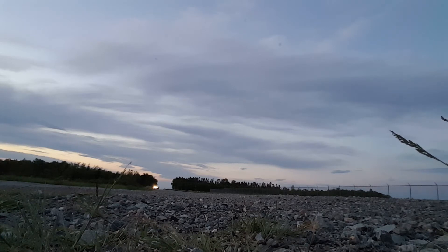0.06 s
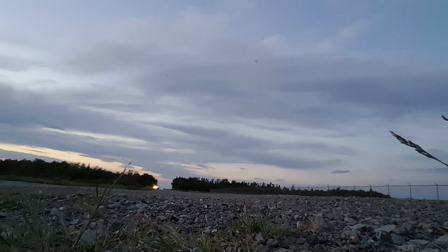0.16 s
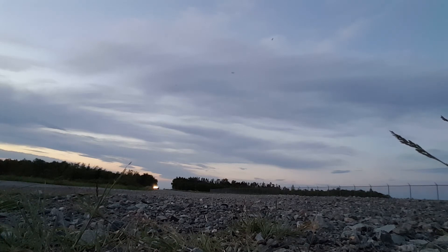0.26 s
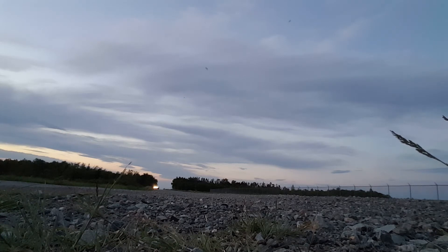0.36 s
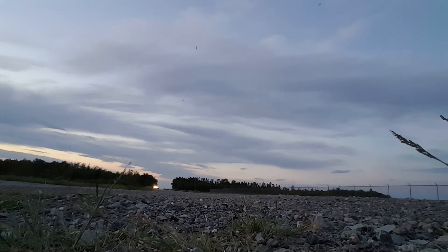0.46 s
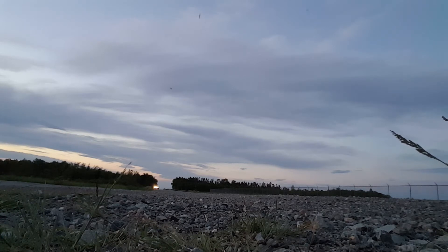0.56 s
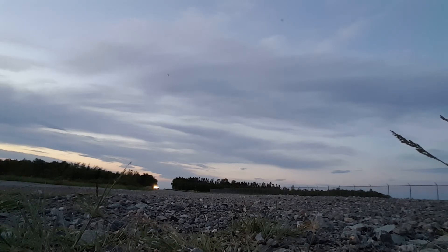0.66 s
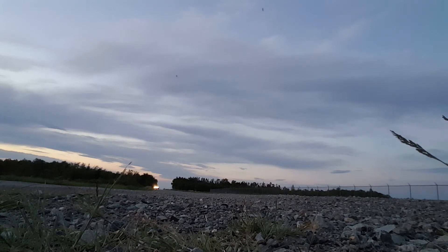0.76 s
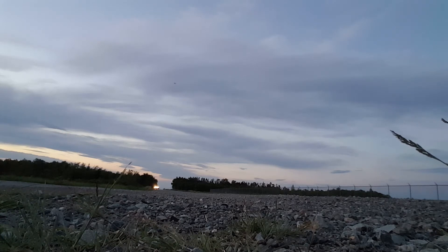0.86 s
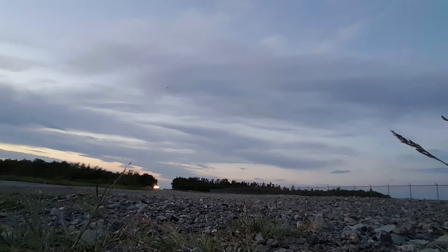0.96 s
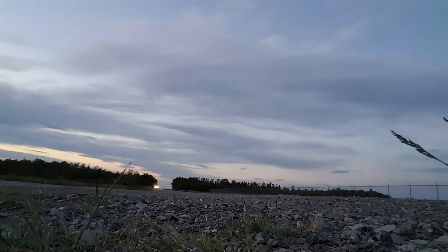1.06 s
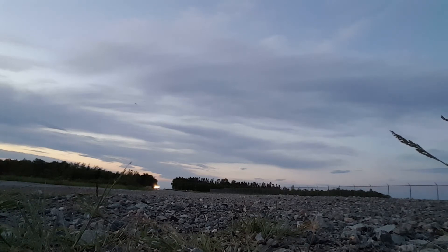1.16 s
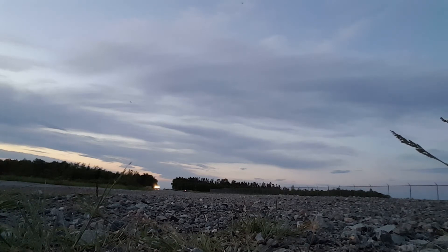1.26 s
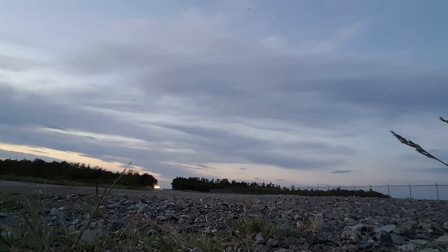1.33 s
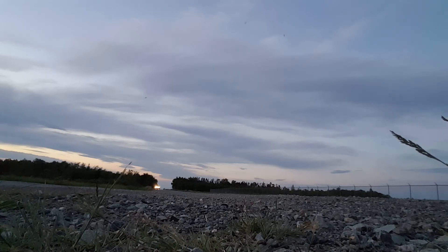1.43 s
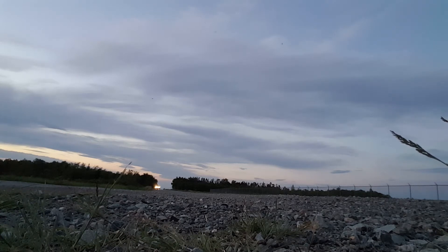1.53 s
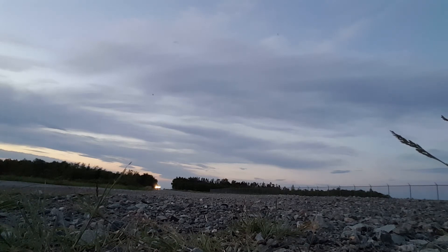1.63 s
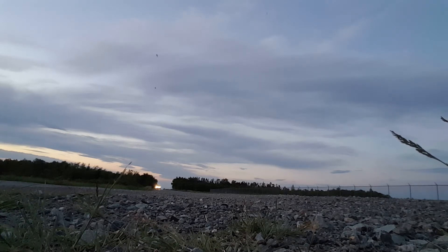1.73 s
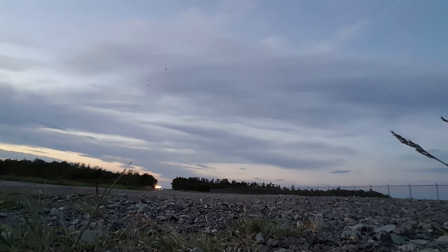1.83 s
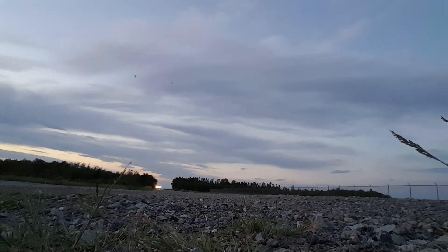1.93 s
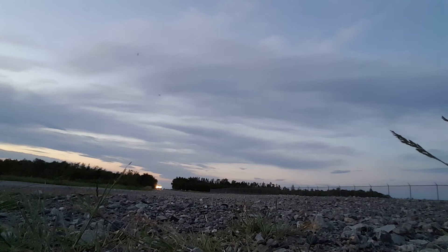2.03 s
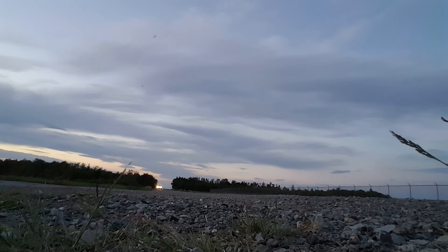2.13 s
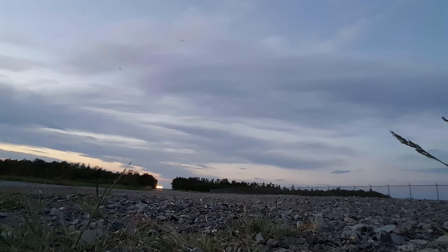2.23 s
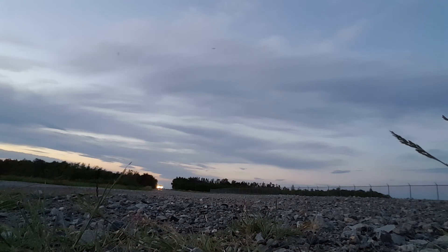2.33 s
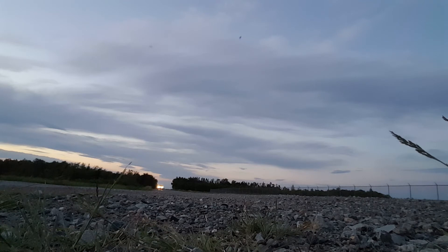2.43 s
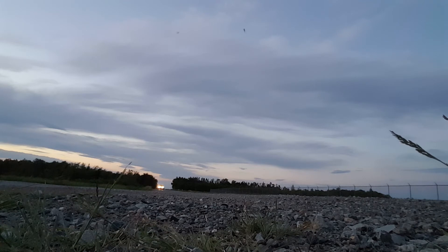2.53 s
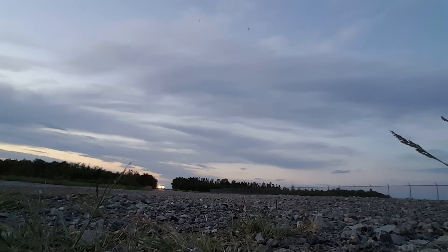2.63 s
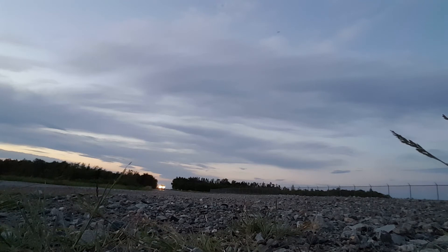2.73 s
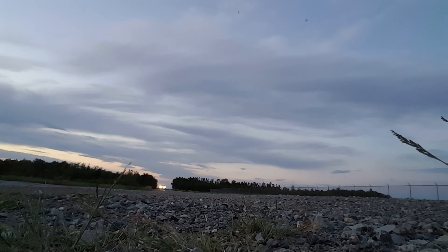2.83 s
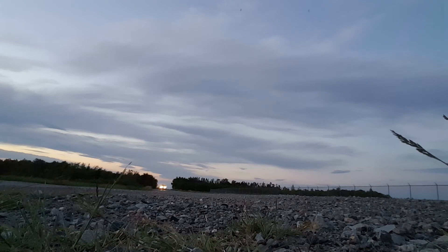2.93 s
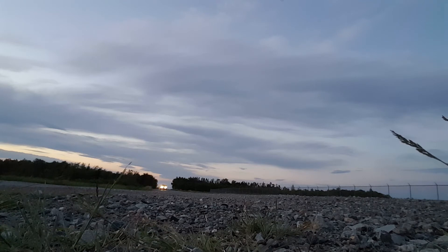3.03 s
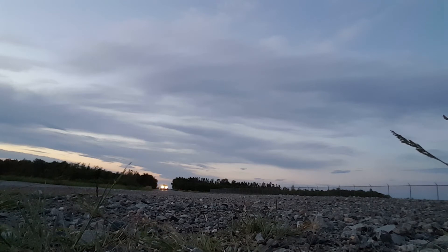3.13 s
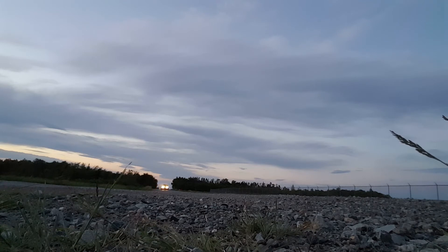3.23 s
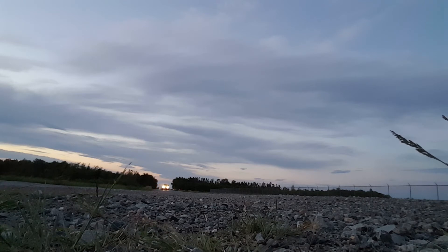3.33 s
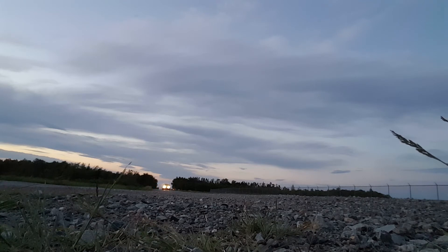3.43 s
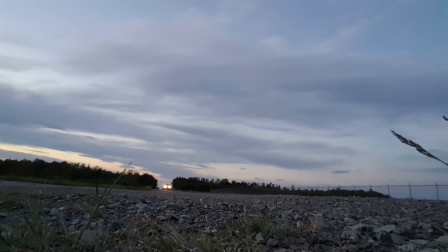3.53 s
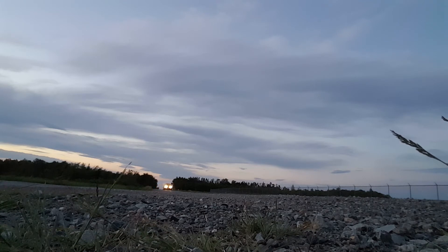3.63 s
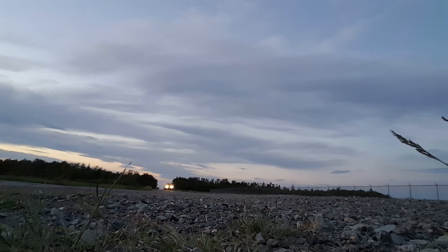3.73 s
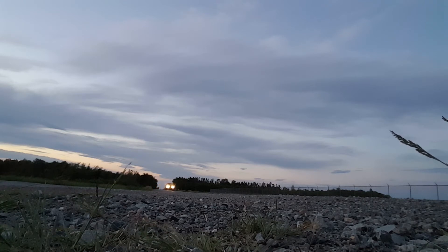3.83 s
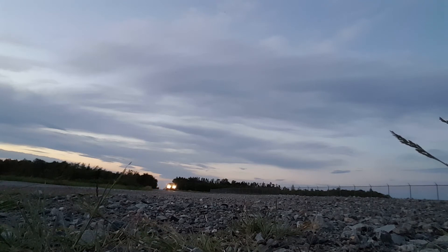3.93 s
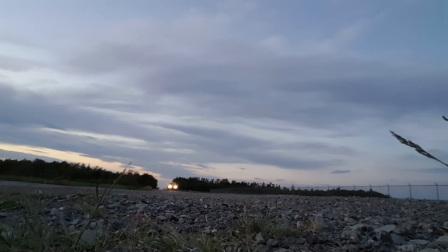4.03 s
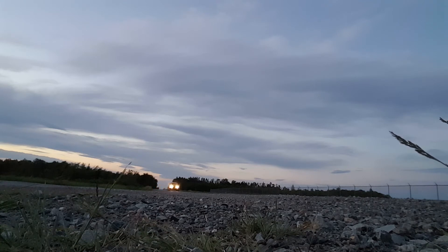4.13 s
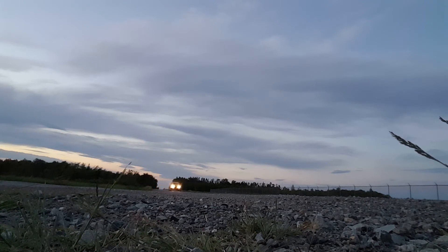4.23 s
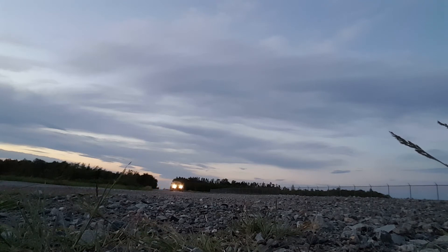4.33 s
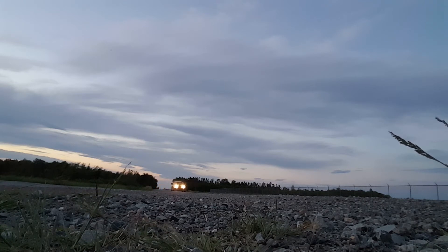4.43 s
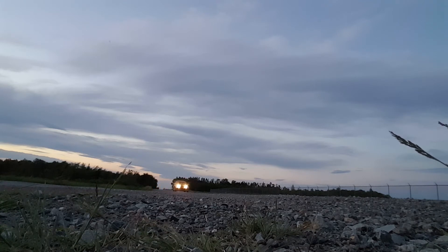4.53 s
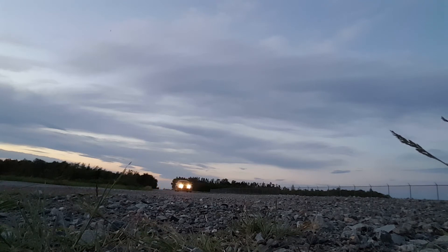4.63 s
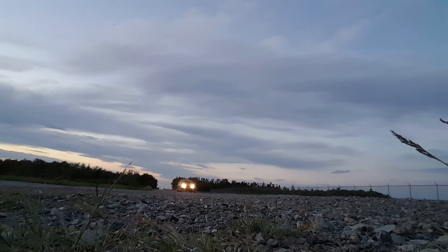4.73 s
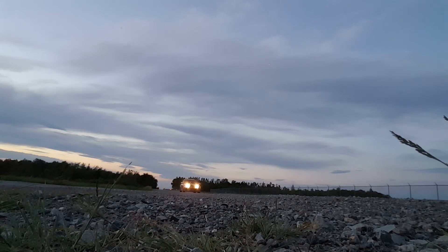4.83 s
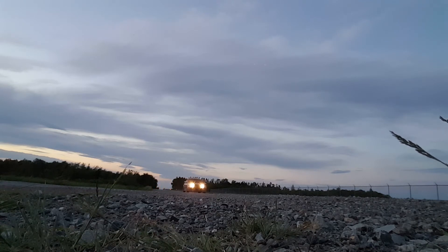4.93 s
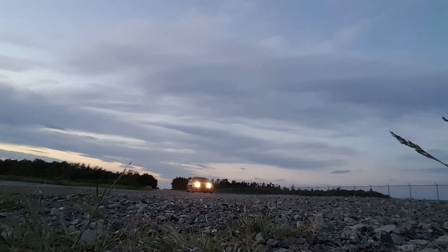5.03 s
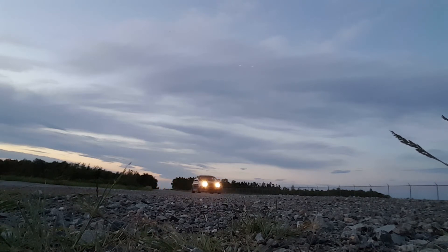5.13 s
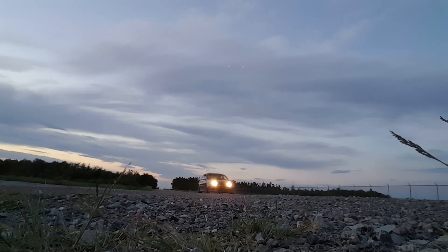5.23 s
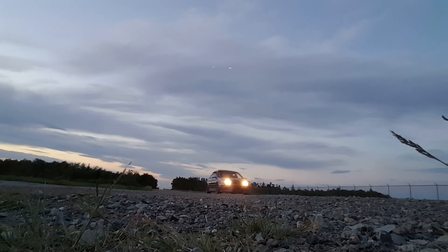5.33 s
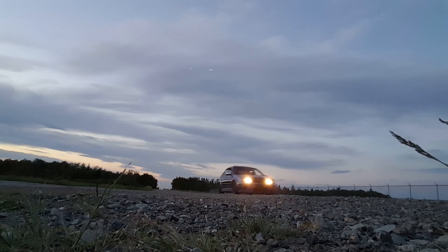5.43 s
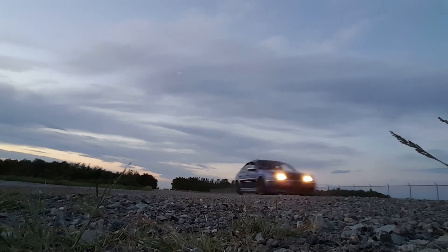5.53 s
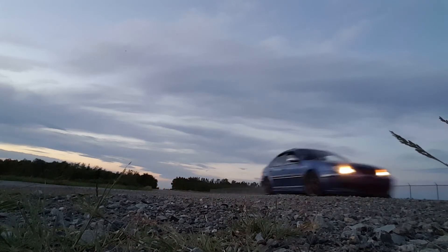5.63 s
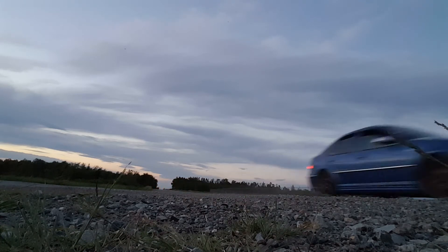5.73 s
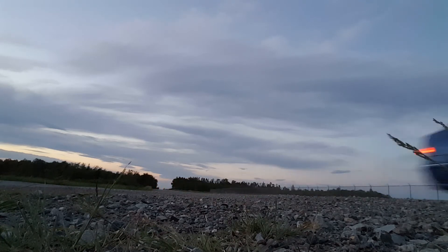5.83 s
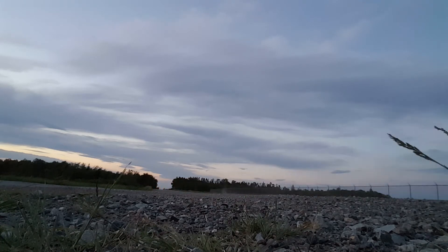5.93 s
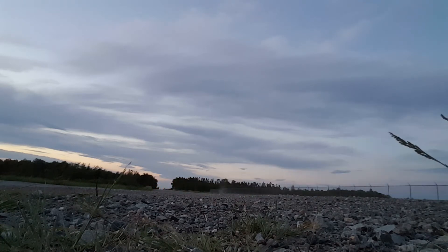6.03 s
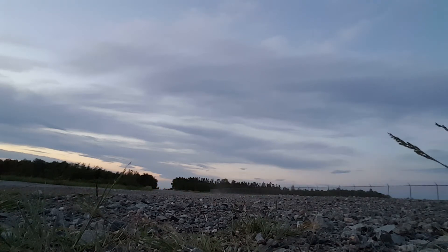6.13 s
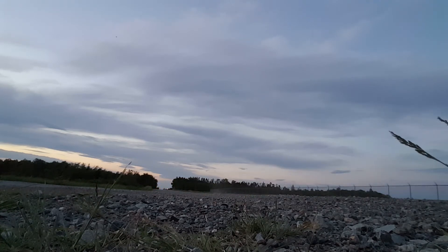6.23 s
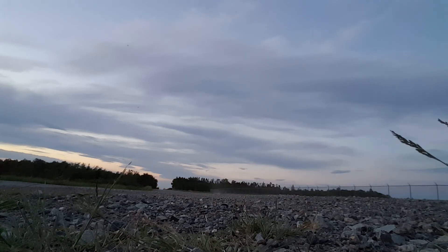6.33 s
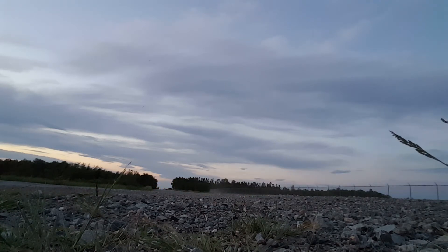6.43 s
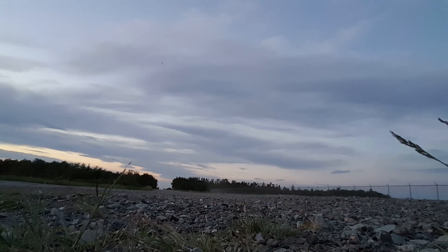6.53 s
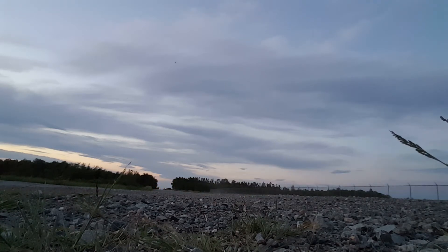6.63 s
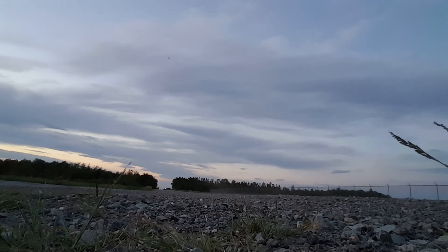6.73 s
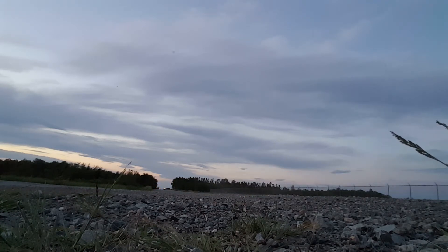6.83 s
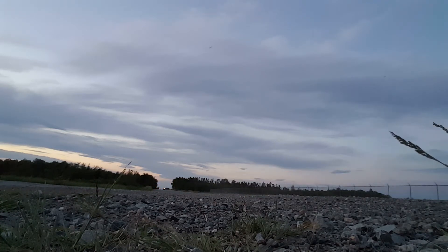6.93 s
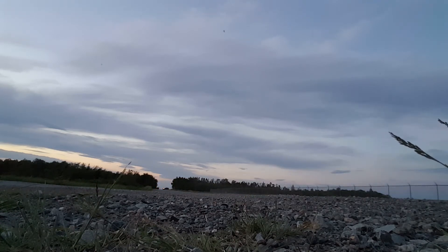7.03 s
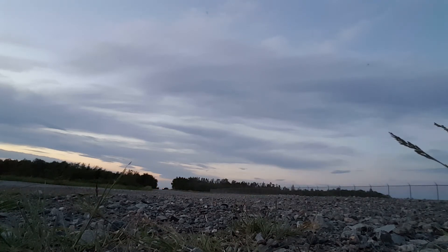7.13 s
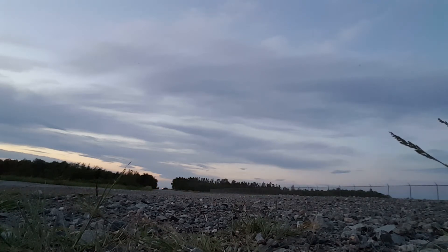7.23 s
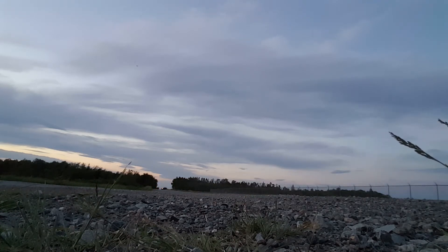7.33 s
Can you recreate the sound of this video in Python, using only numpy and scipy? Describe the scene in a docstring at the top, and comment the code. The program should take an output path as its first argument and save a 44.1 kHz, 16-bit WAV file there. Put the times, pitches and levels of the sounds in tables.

```python
"""Over a faint steady hiss, a turbocharged four-cylinder car accelerates up a country road: firing tones and
their quarter steps are summed sines, tyre and air roar is banded noise. It lifts to shift with a thump and burble;
then a turbo whistle and a fainter whine, both jittered sines, rise. It passes a phone lying at the verge, shows
its tailpipe and lifts again. The phone's two ports hear it with a lag and a shadow that follow its bearing."""
import sys
import numpy as np
from scipy import signal
from scipy.fft import rfft, irfft
from scipy.io import wavfile
from scipy.ndimage import uniform_filter1d, minimum_filter1d, map_coordinates

SR = 44100
rng = np.random.default_rng(int(sys.argv[2]) if len(sys.argv) > 2 else 0)


def store_wav(level_fs):
    """Save 16-bit WAV to argv[1]."""
    pcm = np.round(np.clip(np.atleast_2d(level_fs), -1, 1) * 32767)
    wavfile.write(sys.argv[1], SR, pcm.T.astype(np.int16))


N = 324576

# Exhaust as heard: (time [s], firing rate [Hz], 1st firing tone [dB], 2nd firing tone [dB])
EXHAUST = [(0.05, 136, -56, -65.5), (0.6, 147.6, -43, -56), (1.2, 163.1, -42.5, -51),
           (1.5, 170.6, -52.5, -47), (2.1, 191.7, -44.5, -56), (2.4, 202, -44.5, -71.5),
           (2.85, 216.7, -33.5, -50.5), (3.55, 235.7, -29, -47), (3.69, 222.2, -32, -46),
           (3.86, 217.4, -29.5, -43.5), (3.97, 203.9, -30, -56), (4.09, 167.5, -36.5, -55),
           (4.4, 173.6, -29, -41.5), (5, 185.9, -33, -35.5), (5.55, 194.6, -21, -18.5),
           (5.8, 191.5, -15.5, -22.5), (5.88, 185.5, -7, -37), (5.94, 188, -20, -17.5),
           (5.985, 185.5, -11.5, -20), (6.025, 183.3, -20.5, -18.5), (6.09, 176.7, -15, -18),
           (6.18, 174.4, -21.5, -17), (6.27, 171, -19.5, -18), (6.35, 164, -28, -20),
           (6.43, 168.1, -26, -33.5), (6.85, 156.9, -34, -42.5), (6.92, 155.8, -26, -27),
           (6.98, 149.2, -36.5, -29), (7.1, 132.3, -20, -25.5), (7.25, 134.2, -14.5, -20),
           (7.36, 132.7, -19, -21)]
# Upper exhaust tones: (time [s], 3rd firing tone [dB], cylinder unevenness [dB],
# rasp above the 3rd tone [dB over the unevenness])
UPPER_EXHAUST = [(0.05, -73, -77, 6), (0.6, -58, -59, 4.5), (1.2, -65.5, -62.5, 1), (1.6, -61, -49.5, -7),
                 (2.4, -62, -51.5, -1), (2.95, -55, -48.5, 9), (3.55, -49.5, -43.5, 10.5),
                 (4.09, -54, -48, 5.5), (4.4, -50.5, -39, 3.5), (5, -50, -38.5, 3), (5.7, -29, -26.5, 0),
                 (5.95, -26, -24, 7), (6.29, -25.5, -22.5, 2.5), (6.47, -62, -36, -11),
                 (6.85, -59, -42, -7), (7.1, -26.5, -30, -2.5), (7.25, -20, -33, 0.5)]
# Offsets over the unevenness, by quarter step: (higher firing tones, then a quarter, half, three quarters above [dB])
QUARTER_STEP_DB = [2, -8, -4.5, -2.5]
# Pipe resonances: (centre [Hz], width [Hz], level [dB])
PIPE = [(117, 20, -9.5), (319.7, 110, 0), (489, 85, -6), (792, 110, -8.5), (950, 71, -20)]
# Heard with the tailpipe in view: (multiple of the firing rate, level over unevenness plus rasp [dB])
TAIL_TONES = [(4, -10.5), (5, -16)]
# Lifts of the throttle: (time [s], burble length [s], burble [dB], thump [dB], back on load [s])
LIFTS = [(3.615, .07, -43, -36, 4.2), (6.3, .25, -15, -30, 7.1)]
# Burble tones: (multiple of the firing rate, level over the lift's burble [dB], fade [dB/s])
BURBLE = [(.25, -16, 80), (.5, -3, 110), (.75, 0, 40), (1.25, -7, 90), (1.5, -12, 60), (2.25, -8, 60)]
# Rolling noise: (time [s], body drone [dB], tyre roar [dB], its upper edge [dB]); the edge tells how clear the path is
ROAD = [(0.1, -67, -65, -90), (1.3, -63.5, -64.5, -75), (2, -63, -57, -81.5), (3.1, -50.5, -45, -71),
        (3.6, -46.5, -38.5, -66.5), (4.6, -41.5, -30.5, -51), (5.25, -34.5, -23, -38),
        (5.6, -31.5, -18.5, -29), (5.85, -24.5, -18, -23), (6.02, -28.5, -28.5, -26.5),
        (6.22, -30, -35, -35), (6.31, -26.5, -32, -37), (6.42, -42, -28.5, -38), (6.75, -44.5, -30, -44.5),
        (6.95, -43.5, -26.5, -46), (7.1, -35, -28, -43.5), (7.3, -33.5, -26.5, -43.5)]
# Bands of the rolling noise: (from [Hz], to [Hz], likeness of the ports before spread [0-1])
BANDS = [(35, 100, .99), (590, 720, .99), (900, 1500, .97), (2000, 3200, .88), (4500, 9000, .3),
         (12000, 15500, .2)]
# Spectrum of the rolling noise: (frequency [Hz], density [dB per Hz])
ROAD_TONE = [(20, -32.5), (45, -8.5), (130, 2.5), (250, 0.5), (500, -0.5), (1400, 6.5), (1650, 0.5),
             (2000, -2.5), (2600, -12.5), (3200, -25.5), (3800, -33), (5600, -35), (6100, -33.5),
             (8000, -27.5), (9700, -40), (11000, -34.5), (15700, -32)]
# Each band's extra lag round the phone's body: (share of the lead)
PORT_LAG = [0, .1, -.22, .08, 0, 0]
# Layers that follow the pass: (level [dB], per dB of upper edge [dB], per dB of distance [dB],
# tail in view [dB], off load ahead [dB])
RUMBLE = (-26, 0.28, -0.3511, -2.5, 3)
LOW_HISS = (-39, 0, -1.6939, -2.5, 1.5)
HIGH_HISS = (-42, 0, -2, -4, 0)
# Turbo whistle: (time [s], pitch [Hz])
TURBO = [(4.2, 11950), (4.7, 12350), (5, 12130), (5.33, 11480), (5.76, 11420), (5.9, 10940), (6.07, 10000)]
# Fainter whine, perhaps gears: (time [s], pitch [Hz], level [dB])
WHINE = [(4.7, 6750, -100), (5, 6800, -79), (5.5, 6980, -67), (5.75, 6950, -100)]
# Bearing: (time [s], lead of the left port [ms])
BEARING = [(0, -.12), (5, -.09), (5.54, 0), (5.75, .13), (5.89, .36), (6.04, .5), (6.2, .385), (6.31, .33),
           (6.45, .3), (7.36, .28)]
# Spectrum of the background hiss: (frequency [Hz], density [dB per Hz])
FIELD = [(700, -8.5), (1500, 3.5), (2000, 16), (3000, 9), (5000, 4), (8000, -2), (10000, -2.5),
         (12500, 1.5), (15700, 1)]

FIELD_DB = -72
PASS_S, VERGE_S = 5.889, 0.12  # closest approach; distance to the road over speed
TURN_S = 0.18  # the tail swings into view
CLOSE_S, OPEN_S = 0.11, 0.18  # load fades after a lift; builds before it is back
TRAIL_ON_LOAD_DB, TRAIL_OFF_LOAD_DB = -63, -68.5  # lower hiss that trails the leaving car
VENT_DB, VENT_S = 3.5, 0.09
TURBO_DB, TURBO_DB_PER_DB = -48, -1.8  # closest; per dB of distance
TURBO_FROM_S, TURBO_RISE_DB_PER_S = 4.4, 60  # spools up after the shift
TURBO_TO_S, TURBO_FALL_DB_PER_S = 5.99, 320  # the body hides it after the pass
ROAR_PAN_DB, ROAR_PAN_DB_PER_MS = 1.2, 9  # left minus right; per ms of lead
HISS_PAN_DB, HISS_PAN_DB_PER_MS = 1.8, 18
SPREAD_NEAR, SPREAD_PER_S = 0.2, 0.017  # share spread over the car's length; scattered on the way in
TOP_HZ = 15790


def exhaust():
    """Clean firing tones, quarter-step tones shaped by the pipe, and the burble of unburnt cycles."""
    rate_hz, first_db, second_db = curves(EXHAUST)
    third_db, uneven_db, rasp_db = curves(UPPER_EXHAUST)
    # whole multiples share one slightly unsteady crank angle: a steep pressure front at each firing
    crank = 2 * np.pi * np.cumsum(rate_hz) / SR + 0.06 * walk(30)

    def tone(multiple, db, shake_db):
        """One exhaust tone of wavering level; fractional multiples start at a random phase."""
        start = rng.uniform(0, 2 * np.pi) * (multiple % 1 > 0)
        return np.sqrt(2) * undb(db + shake_db * walk(25)) * np.sin(-multiple * crank + start)

    out = tone(1, first_db, 1.0) + tone(2, second_db, 1.0) + tone(3, third_db, 1.0)

    tail_in_view = passing()[1]
    for multiple, db in TAIL_TONES:
        out += tail_in_view * tone(multiple, uneven_db + rasp_db + db, 2.4)

    for quarter in range(3, 23):
        if quarter in (4, 8, 12):  # the three clean firing tones
            continue
        tone_hz = rate_hz * quarter / 4
        ring = sum(undb(db) / (1 + (2 * (tone_hz - centre_hz) / width_hz) ** 2)
                   for centre_hz, width_hz, db in PIPE)
        level_db = uneven_db + rasp_db * (quarter > 12) + QUARTER_STEP_DB[quarter % 4]
        out += ring * tone(quarter / 4, level_db, 1.7)

    for lift_s, length_s, lift_db, *_ in LIFTS:
        since_s = np.arange(N) / SR - lift_s
        gate = np.interp(since_s, [-0.015, 0, length_s, length_s + 0.03], [0, 1, 1, 0])
        for multiple, db, fade_db_per_s in BURBLE:
            level_db = lift_db + db - fade_db_per_s * np.clip(since_s, 0, 1)
            out += gate * undb(level_db) * np.sin(multiple * crank + rng.uniform(0, 2 * np.pi))
    return out


def thump():
    """Low noise of gas surging in the pipe when the throttle shuts."""
    band = signal.butter(2, [45, 170], "band", fs=SR, output="sos")
    surge = signal.sosfilt(band, rng.standard_normal(N))
    gate = sum(undb(db) * np.interp(np.arange(N) / SR - lift_s, [-0.008, 0, 0.065, 0.085], [0, 1, 0.8, 0])
               for lift_s, _, _, db, _ in LIFTS)
    return gate * surge / surge.std()


def rolling(lead_ms, spread, roar_pan_db, hiss_pan_db):
    """Overlapping bands of one coloured noise, partly shared by both ports; each band flutters a little."""
    swell_db = vent()
    levels_db = [follow(RUMBLE), *curves(ROAD), low_hiss() + swell_db, follow(HIGH_HISS) + swell_db]
    pans_db = [0.2 * roar_pan_db, roar_pan_db, roar_pan_db, 0.5 * roar_pan_db, hiss_pan_db, hiss_pan_db]
    hz, tone = colour(ROAD_TONE)
    noises = rfft(rng.standard_normal((3, N))) * tone  # shared, left only, right only
    centres = [np.log(lo_hz * hi_hz) / 2 for lo_hz, hi_hz, _ in BANDS]
    crossfades = np.eye(len(BANDS))  # each row peaks at its band and falls to 0 at its neighbours
    out = np.zeros((2, N))
    for band, db, pan_db, extra, corner in zip(BANDS, levels_db, pans_db, PORT_LAG, crossfades):
        lo_hz, hi_hz, likeness = band
        scale = np.sqrt(np.sum(tone[(hz > lo_hz) & (hz < hi_hz)] ** 2) / len(hz))
        shared, *own = irfft(noises * np.interp(np.log(hz), centres, corner), N) / scale
        alike = likeness * (1 - np.clip(spread, 0, 1))
        gain = undb(db + 1.2 * walk(9) + np.array([pan_db, -pan_db]) / 2)
        extra_ms = extra * lead_ms / 2
        common = np.array([lag(shared, -extra_ms), lag(shared, extra_ms)])
        out += gain * (np.sqrt(alike) * common + np.sqrt(1 - alike) * np.array(own))
    return out


def low_hiss():
    """Level [dB] of the lower hiss: the pass and the trail, added in power."""
    _, behind, load = passing()
    trail = behind * undb(load * TRAIL_ON_LOAD_DB + (1 - load) * TRAIL_OFF_LOAD_DB)
    return 20 * np.log10(np.hypot(undb(follow(LOW_HISS)), trail))


def vent():
    """Brief swell [dB] of the hiss as boost is vented at each lift."""
    t = np.arange(N) / SR
    return VENT_DB * sum(np.interp(t - lift_s, [-VENT_S / 2, 0, VENT_S / 2, VENT_S], [0, 1, 1, 0])
                         for lift_s, *_ in LIFTS)


def whistle(hz, db):
    """Breathy whistle: a sine whose pitch and level jitter."""
    phase = 2 * np.pi * np.cumsum(hz * (1 + 0.012 * walk(500))) / SR
    return np.sqrt(2) * undb(db + 1.5 * walk(90)) * np.sin(phase)


def field():
    """Faint steady hiss of the evening and the phone: coloured noise, unrelated left and right."""
    hiss = irfft(rfft(rng.standard_normal((2, N))) * colour(FIELD)[1], N)
    return hiss * undb(FIELD_DB) / hiss.std()


def passing():
    """Distance [dB over the closest], tail in view [0-1] and load [0-1]."""
    t = np.arange(N) / SR
    along_s = t - PASS_S
    load = 1 - sum(np.interp(t, [lift_s, lift_s + CLOSE_S, on_s - OPEN_S, on_s], [0, 1, 1, 0])
                   for lift_s, *_, on_s in LIFTS)
    behind = np.clip(along_s / TURN_S, 0, 1)
    return 10 * np.log10(1 + (along_s / VERGE_S) ** 2), behind, load


def follow(rule):
    """Level [dB] of a layer from path, distance, view and load."""
    db, *shares = rule
    far_db, behind, load = passing()
    edge_db = curves(ROAD)[2]
    causes = [edge_db, far_db, behind, (1 - behind) * (1 - load)]
    return db + sum(share * cause for share, cause in zip(shares, causes))


def undb(db):
    """Amplitude of a level in dB."""
    return 10 ** (np.asarray(db) / 20)


def curves(table):
    """Columns of a table, one value a sample."""
    s, *columns = np.transpose(table)
    return [np.interp(np.arange(N) / SR, s, column) for column in columns]


def walk(rate_hz):
    """Random levels held 1 / rate_hz and slewed twice."""
    hold = int(SR / rate_hz)
    steps = np.repeat(rng.standard_normal(N // hold + 1), hold)
    return 1.02 * uniform_filter1d(uniform_filter1d(steps, hold), hold)[:N]


def colour(points):
    """Frequencies [Hz] of the spectrum and the gain of (frequency [Hz], level [dB]) points on them."""
    hz = np.arange(N // 2 + 1) * SR / N + 1  # 1 Hz up, to keep the log finite
    point_hz, point_db = np.transpose(points)
    return hz, undb(np.interp(np.log(hz), np.log(point_hz), point_db))


def lag(x, ms):
    """Moving delay, read by cubic interpolation."""
    return map_coordinates(x, [np.arange(N) - ms * SR / 1000], order=3, mode="nearest")


def scene():
    """The car at the two ports, lagged and shadowed by bearing, over the background hiss."""
    t = np.arange(N) / SR
    lead_ms = curves(BEARING)[0]
    far_db = passing()[0]
    roar_pan_db = ROAR_PAN_DB + ROAR_PAN_DB_PER_MS * lead_ms
    hiss_pan_db = HISS_PAN_DB + HISS_PAN_DB_PER_MS * lead_ms
    spread = SPREAD_NEAR * undb(-2 * far_db) + SPREAD_PER_S * np.clip(PASS_S - t, 0, None)

    turbo_db = TURBO_DB + TURBO_DB_PER_DB * far_db
    turbo_db -= TURBO_RISE_DB_PER_S * np.clip(TURBO_FROM_S - t, 0, None)
    turbo_db -= TURBO_FALL_DB_PER_S * np.clip(t - TURBO_TO_S, 0, None)
    whistles = whistle(curves(TURBO)[0], turbo_db) + whistle(*curves(WHINE))

    car = (exhaust() + thump()) * undb(np.array([[0.4], [-0.3]]))  # left, right [dB]
    car += rolling(lead_ms, spread, roar_pan_db, hiss_pan_db)
    car += whistles * undb(np.array([hiss_pan_db, -hiss_pan_db]) / 2)
    left = lag(car[0], 0.3 - lead_ms / 2)
    right = lag(car[1], 0.3 + lead_ms / 2)
    return np.array([left, right]) + field()


def record(dry):
    """A limiter holds the loudest peaks; the phone cuts the top."""
    peak = np.abs(dry).max(axis=0) + 1e-9
    ceiling = minimum_filter1d(np.minimum(1, 0.93 / peak), size=301)
    limited = dry * uniform_filter1d(ceiling, size=301)
    return signal.sosfilt(signal.ellip(12, 0.2, 80, TOP_HZ, fs=SR, output="sos"), limited)


dry = scene()
out = record(dry)
store_wav(out)
```